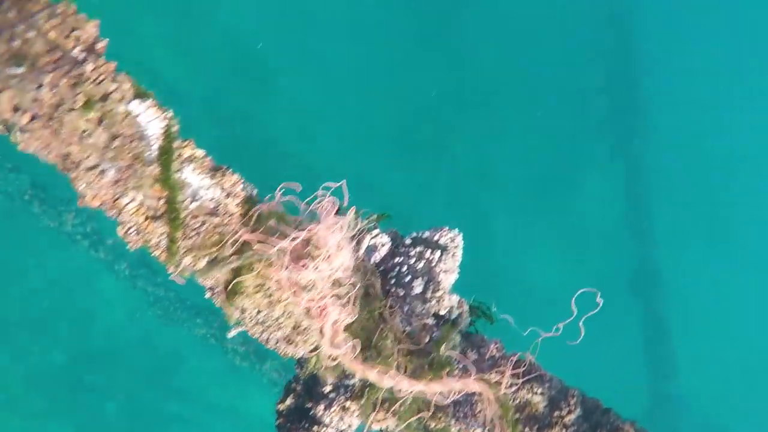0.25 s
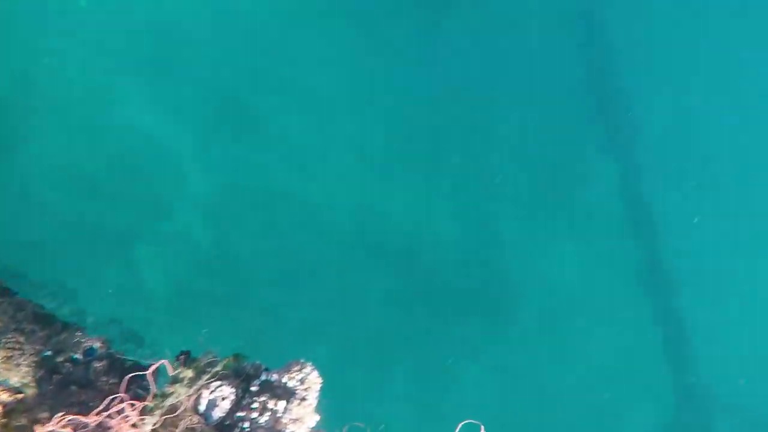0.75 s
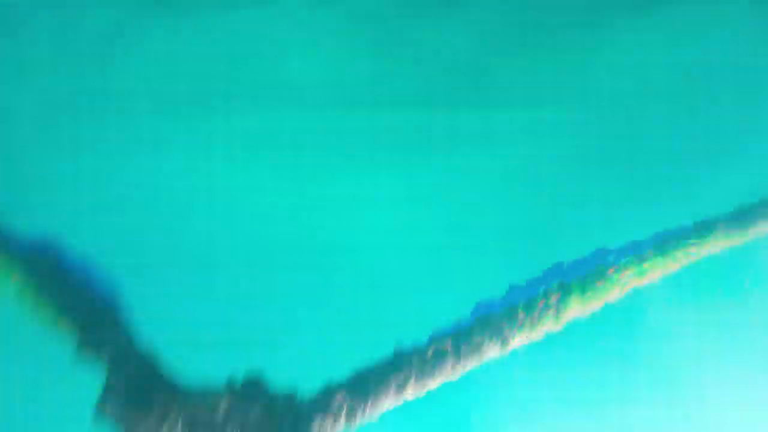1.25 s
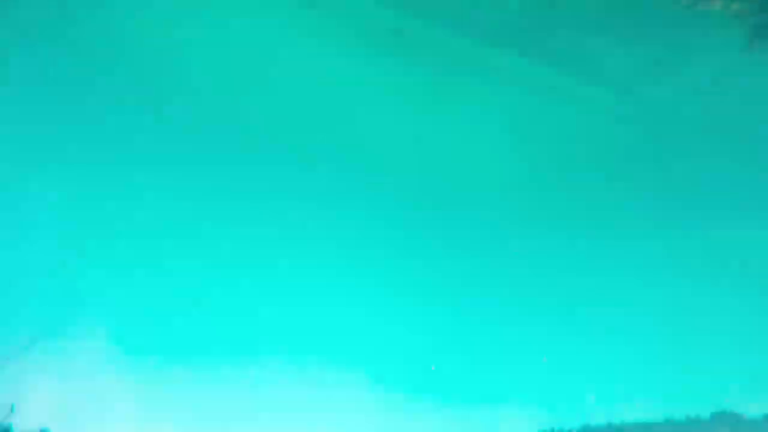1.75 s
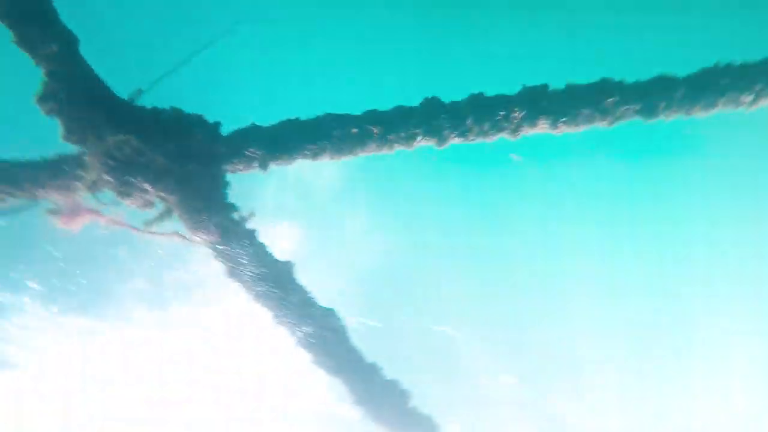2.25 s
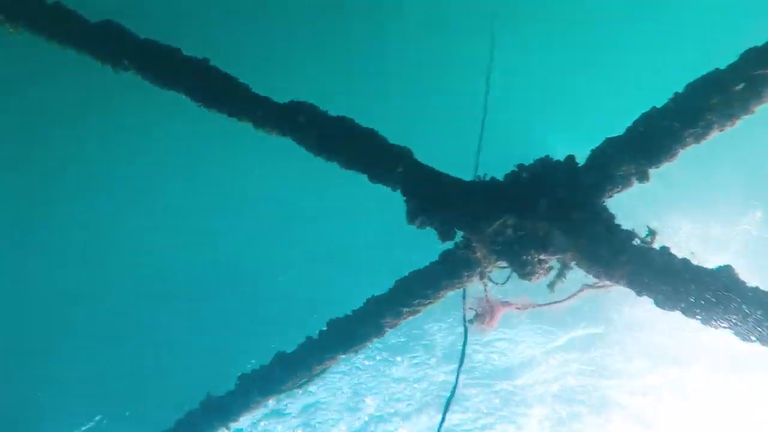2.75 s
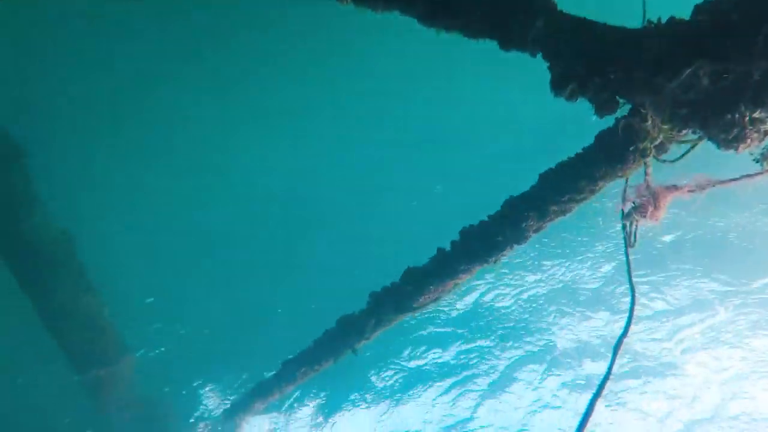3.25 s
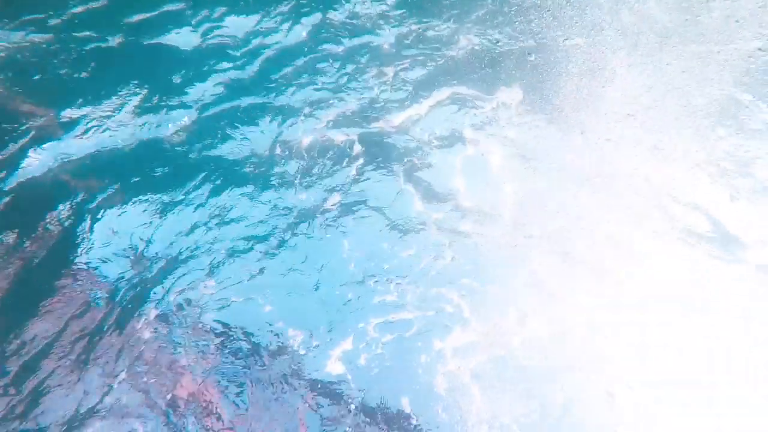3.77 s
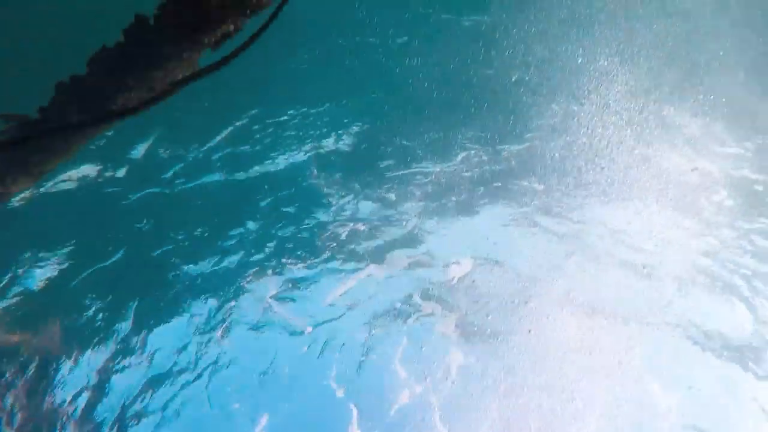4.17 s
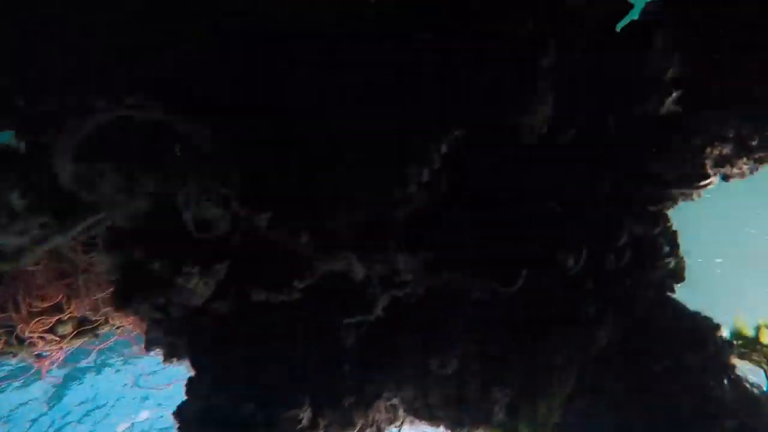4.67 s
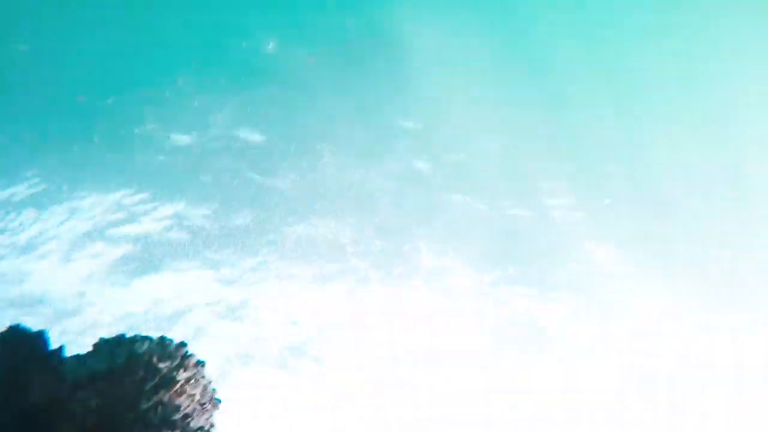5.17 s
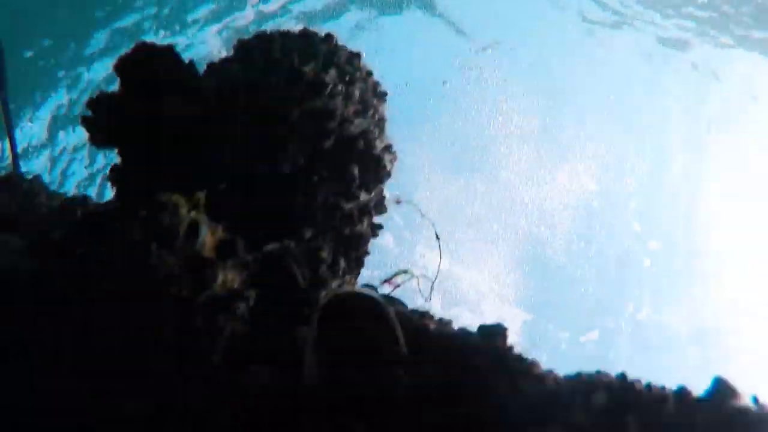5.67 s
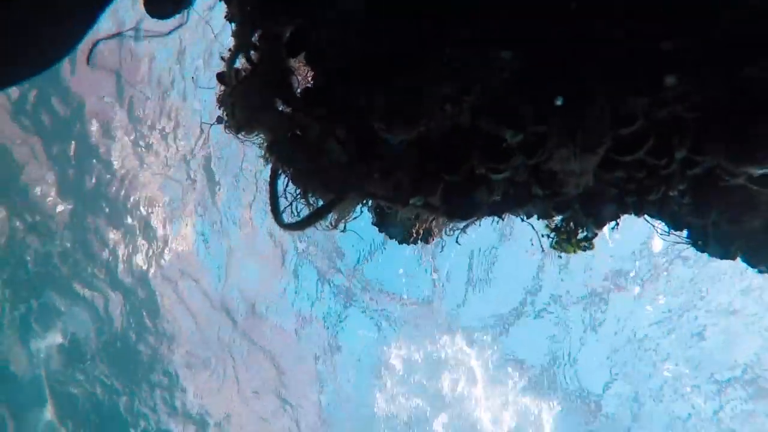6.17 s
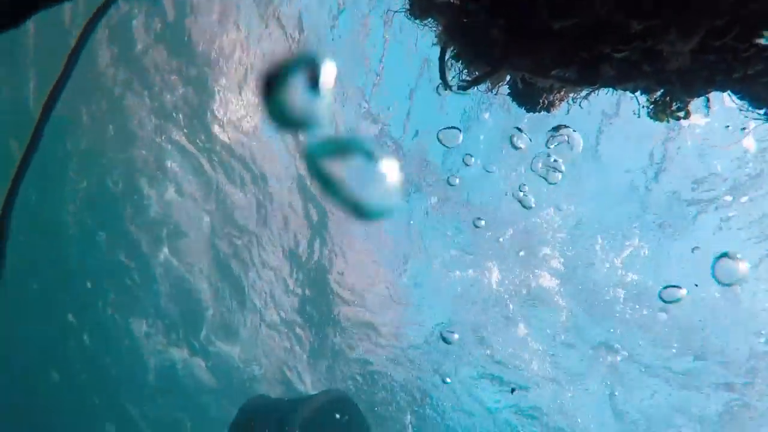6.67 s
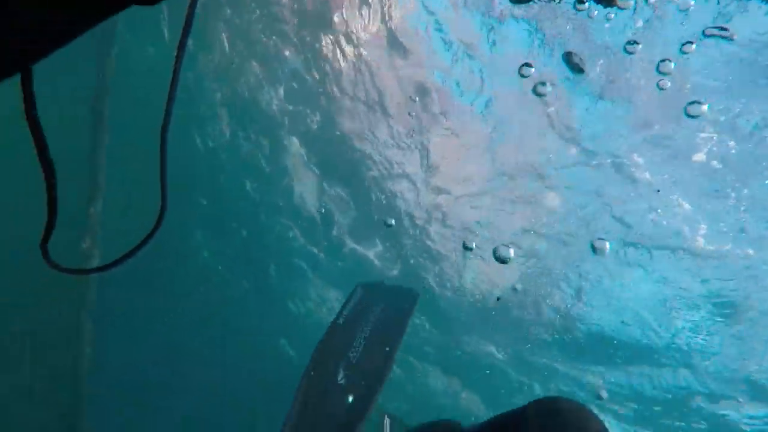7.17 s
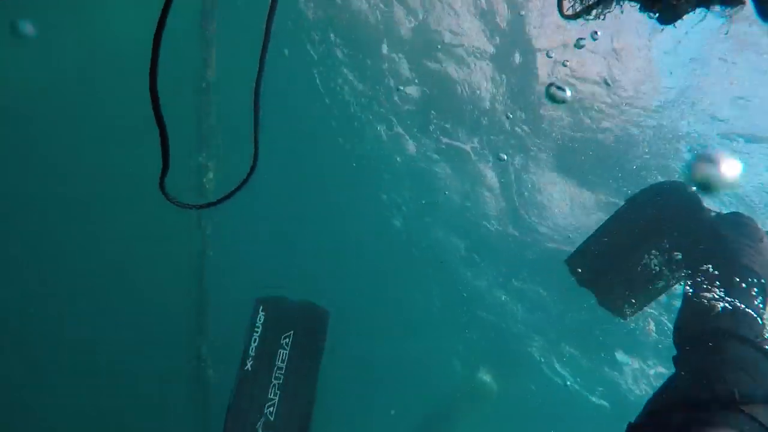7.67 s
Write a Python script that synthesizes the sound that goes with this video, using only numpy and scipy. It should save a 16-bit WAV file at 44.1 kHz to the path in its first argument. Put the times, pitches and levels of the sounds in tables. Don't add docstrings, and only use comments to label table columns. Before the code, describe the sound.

Muffled underwater rumble and drumming against a sealed housing, with heavy dull knocks, scrapes, hissing surf fizz, ticking pops and late ringing bubbles.

```python
import sys
import numpy as np
from scipy import signal
from scipy.fft import rfft, irfft, next_fast_len
from scipy.io import wavfile
from scipy.ndimage import uniform_filter1d, map_coordinates

SR = 44100
rng = np.random.default_rng(int(sys.argv[2]) if len(sys.argv) > 2 else 0)


def volts_from_db(level):
    exponent = np.asarray(level, float) / 20
    return 10 ** exponent


def transcribe(u):
    v = np.clip(np.atleast_2d(u).T, -1, 1)
    q = np.round(v * 32767).astype(np.int16)
    wavfile.write(sys.argv[1], SR, q)


N = 349272

# freq_hz, lead_rad
PORT_LEAD = [(250, 0.6), (500, 1.28), (800, 2.6), (1100, 3.6), (1500, 0.93), (1800, 1.53)]


def unit(x):
    return x / np.sqrt(np.mean(x ** 2) + 1e-20)


def along(points, hz):
    f, db = np.transpose(points)
    return volts_from_db(np.interp(np.log(hz + 1), np.log(f + 1), db))


def wobble(rate):
    knots = rng.standard_normal(int(N * rate / SR) + 4)
    return map_coordinates(knots, [np.arange(N) * rate / SR])


def filtered(x, response):
    m = next_fast_len(N + SR // 2)
    f = np.fft.rfftfreq(m, 1 / SR)
    grid = np.linspace(0, SR / 2, 12000)
    gain = [np.interp(f, grid, g) for g in np.atleast_2d(response(grid))]
    return irfft(rfft(x, m) * np.squeeze(gain), m)[..., :N]


def mode(f, hz, width_hz):
    return 1j * f * width_hz / (hz * hz - f * f + 1j * f * width_hz)


def ports(own_db):
    return rng.standard_normal(N) + volts_from_db(own_db) * rng.standard_normal((2, N))


def rings(events, lasts, usual_db, damping, fall, attack):
    out = np.zeros((2, N + SR))
    for s, db, hz, *pan_db in events:
        t60 = lasts * volts_from_db(-damping * (db - usual_db)) / hz
        t = np.arange(round(t60 * SR)) / SR
        cycles = hz * (t + fall * t60 / 8 * (1 - np.exp(-8 * t / t60)))
        lead = 0.76 * np.interp(hz, *np.transpose(PORT_LEAD))
        envelope = volts_from_db(-60 * t / t60) * (1 - np.exp(-t * hz / attack))
        tone = envelope * np.sin(2 * np.pi * cycles + [[0], [lead]])
        pan = np.array([[.5], [-.5]]) * sum(pan_db)
        gain = volts_from_db(db + 1.5 + pan) / max(np.cos(lead / 2), .5)
        out[:, round(s * SR):][:, :len(t)] += gain * tone
    return out[:, :N]


def grains(count, centre_hz, spread, cycles, size_db, size=300):
    draw, t = rng.random((count, 3)), np.arange(size) / SR
    hz = centre_hz * np.exp(spread * (2 * draw[:, 1:2] - 1))
    strength = volts_from_db(-size_db * np.log(draw[:, 2:] + 0.01))
    envelope = (hz * t / cycles) * np.exp(-3 * hz * t / cycles)
    wave = strength * np.sin(2 * np.pi * hz * t) * envelope
    at = (draw[:, :1] * N).astype(int) + np.arange(size)
    return unit(np.bincount(at.ravel(), wave.ravel(), N + size)[:N])


def bursts(events, t60, gain_of_last, push=0, rise=1e-5):
    out, t = np.zeros((2, N + SR)), np.arange(SR // 16) / SR
    noise = rng.standard_normal((len(events), 2, len(t)))
    for (s, db, last), pair in zip(events, noise):
        envelope = volts_from_db(db - 60 * t / t60) * (1 - np.exp(-t / rise))
        out[:, round(s * SR):][:, :len(t)] += envelope * gain_of_last(last) * (push + pair)
    return out[:, :N]


def housing(f):
    # mode_hz, width_hz, left_db, right_db, left_rad, right_rad
    cover_modes = [(940.0, 180.0, -2.1, 2.3, -0.6, 2.8), (1390.0, 360.0, -4.6, -0.8, 1.8, -2.3),
                   (1700.0, 200.0, -9.9, 3.9, -1.1, -0.9), (2050.0, 240.0, -3.0, -0.6, 2.8, 1.6),
                   (2570.0, 670.0, -3.2, -1.8, -1.3, -0.9), (2890.0, 300.0, -6.9, -4.6, 0.8, 2.0),
                   (3270.0, 250.0, 1.3, -9.4, 1.3, 1.0), (3680.0, 600.0, -6.6, -18.7, 3.1, -1.2),
                   (4640.0, 590.0, -13.1, -9.6, 2.3, 0.3), (5290.0, 220.0, -9.4, -40.6, -2.5, -0.3),
                   (5790.0, 750.0, -17.2, -4.8, -2.4, 1.1), (6050.0, 590.0, -13.2, -6.5, -0.6, -2.6),
                   (7490.0, 1500.0, -31.6, -33.7, 0.4, -1.8), (7810.0, 250.0, -26.2, -32.0, -1.4, -2.3),
                   (8530.0, 200.0, -37.7, -24.4, 2.5, 1.1)]
    # freq_hz, level_db
    surf_tilt = [(300, -38.5), (700, 6), (900, -3), (4000, 7), (9000, 1.5), (11000, -4.5), (13000, -8.5),
                 (14700, -17.5), (15500, -120)]
    left = sum(volts_from_db(l) * np.exp(1j * a) * mode(f, hz, w) for hz, w, l, r, a, b in cover_modes)
    right = sum(volts_from_db(r) * np.exp(1j * b) * mode(f, hz, w) for hz, w, l, r, a, b in cover_modes)
    return along(surf_tilt, f) * [left, right]


def fizz(db, treble_db, grain_db, far, sag):
    # start_s, end_s, over_fizz_db
    crackles = [
        (0.804, 0.77, 2),
        (1.063, 1.17, 4.5),
        (1.252, 1.307, 15.5),
        (4.215, 3.9, 13),
    ]
    # mode_hz, width_hz, level_db
    far_modes = [(1260, 140, 6.5), (1760, 66, 9.5), (1955, 130, 8.5), (2647, 124, 4), (3330, 120, -33.5),
                 (5000, 1060, 3), (4930, 580, 3), (7900, 11000, -11)]
    t = np.arange(N) / SR
    bubbles = grains(count=12000, centre_hz=2863, spread=1.078, cycles=6.7, size_db=2.0)
    wash = ports(-7)
    unlike = filtered(rng.standard_normal((2, N)), lambda f: f ** 8 / (f ** 8 + 6400 ** 8))
    wash = wash + volts_from_db(5) * unlike
    water = wash * volts_from_db(1.3 * wobble(30)) + volts_from_db(grain_db - 9.5) * bubbles
    dragging = sum(volts_from_db(over_db) * (t > a) * (t < b) for a, b, over_db in crackles)
    grit = dragging * volts_from_db(3.06 * wobble(150)) * uniform_filter1d(rng.standard_normal(N), size=5)
    force = water + 1.11 * grit
    high = filtered(force, housing)
    low = filtered(force, lambda f: housing(f * (1 + 0.049 * f ** 4 / (f ** 4 + 4300 ** 4))))
    near = (high + np.clip(sag, 0, 1) * (low - high)) / np.sqrt(np.mean(high ** 2))
    sharp = filtered(near, lambda f: np.sqrt(sum(abs(volts_from_db(g) * mode(f, hz, w)) ** 2 for hz, w, g in far_modes)))
    sound = near + np.clip(far, 0, 1) * (sharp - near)
    treble = filtered(sound, lambda f: f ** 4 / (f ** 4 + 6000 ** 4))
    return volts_from_db(db + 1.0) * (sound + (volts_from_db(treble_db) - 1) * treble)


def turbulence(db):
    # freq_hz, density_db
    swirl = [(8, -48.5), (18, 2), (30, -3), (45, -9), (70, -15.5), (120, -26), (250, -70.5), (500, -80.5),
             (1000, -120)]
    eddies = unit(filtered(ports(-13.5), lambda f: along(swirl, f)))
    return volts_from_db(db) * volts_from_db([[.5], [-.5]]) * eddies


def drumming(db):
    # mode_hz, width_hz, level_db
    shell_modes = [(76, 23.4, -3.5), (120.6, 31.2, 1.5), (166.8, 42.6, -0.5), (204.5, 56, -6.5)]
    push = volts_from_db(4.7 * wobble(9) + 0.35 * wobble(25)) * ports(-7.5)

    def shell(f):
        total = sum((-1) ** k * volts_from_db(g) * mode(f, hz, w) for k, (hz, w, g) in enumerate(shell_modes))
        return total * mode(f, 141, 220)

    return volts_from_db(db + 2.5) * unit(filtered(push, shell))


def rubbing(db):
    # start_s, peak_db, left_minus_right_db
    slip_events = [(1.1, -23, 4.5), (1.435, -19, -4.5), (1.171, -35, 0), (1.531, -36, -3.5),
                   (1.563, -22.5, -3), (1.586, -25, 4.5), (1.62, -25.5, -14), (2.207, -27.5, -6.5),
                   (2.284, -24, -1.5), (2.386, -20, 8.5), (2.427, -37.5, -3), (2.473, -23, 2),
                   (2.51, -29.5, 6.5), (2.54, -33, -6), (2.68, -34.5, -2.5), (3.211, -25, 1),
                   (3.275, -24, 4), (3.303, -26.5, -5), (3.346, -25.5, -1.5), (4.619, -24.5, -2),
                   (4.648, -28.5, 9.5), (5.133, -36, -7), (5.298, -21, 4.5), (5.446, -22, 7),
                   (5.527, -22, 2.5), (5.548, -19, -2), (5.597, -16.5, -6), (5.654, -22, -1.5),
                   (5.568, -25, -4.5), (5.607, -21, -7.5), (5.619, -20, -11), (5.632, -18.5, -6),
                   (5.666, -23, -1), (5.69, -15, -7.5), (5.678, -20, -2.5), (5.697, -11.5, -10.5),
                   (5.808, -22, -8), (6.071, -23, 6), (6.113, -25, -3.5), (6.142, -23, -12),
                   (6.223, -16, -1), (7.328, -31.5, 1)]
    # freq_hz, density_db
    rub_tilt = [(100, -9.5), (250, 2.5), (400, -4), (600, -3.5), (800, -2.5), (1000, -13.5), (1400, -12.5),
                (2500, -28.5), (5000, -120)]
    # freq_hz, density_db
    kick_tilt = [(30, -20.5), (100, 6.5), (400, 7), (850, 7.5), (1300, -5), (2500, -43.5), (6000, -120)]
    jerks = volts_from_db(2.0 * wobble(45) + 2.44 * wobble(160))

    def shift(f):
        return np.exp(1j * np.outer([0, 1], np.interp(f, *np.transpose(PORT_LEAD))))

    scrape = unit(filtered(jerks * ports(4.5), lambda f: along(rub_tilt, f) * shift(f)))
    slips = bursts(slip_events, 0.021, lambda pan_db: volts_from_db([[pan_db / 2], [-pan_db / 2]]),
                   push=1.0, rise=0.00073)
    return volts_from_db(db + 5.0) * scrape + volts_from_db(8.5) * filtered(slips, lambda f: along(kick_tilt, f) * shift(f))


def ducking(t):
    # start_s, depth_db, hold_s, recovery_s
    ducks = [
        (5.685, -8.5, 0.03, 0.19),
        (6.14, -3.5, 0.033, 0.18),
    ]
    clamp_s = 0.0057
    db = 0
    for s, depth_db, hold, recover in ducks:
        since = np.maximum(t - s, 0)
        clamped = 1 - np.exp(-since / clamp_s)
        db = db + depth_db * clamped * np.exp(-np.maximum(since - hold, 0) / recover)
    return volts_from_db(db)


def layers():
    # time_s, turbulence_db
    swell = [(0.0, -29), (0.44, -26), (0.95, -32.5), (1.21, -13), (1.83, -20), (2.29, -12.5), (3.04, -22),
             (3.13, -13.5), (4.41, -22), (4.48, -15), (5.14, -19.5), (5.36, -14.5), (5.78, -9), (5.93, -20),
             (6.17, -20), (7.88, -23.5), (7.92, -32)]
    # time_s, level_db
    handling = [(0, -55.5), (.45, -58), (1.09, -51), (1.1, -36), (1.9, -43), (2.53, -42.5), (2.87, -51.5),
                (3.42, -42), (3.71, -47.5), (4.55, -49), (4.9, -41), (5.56, -42), (5.595, -33),
                (5.705, -24.5), (5.715, -37.5), (6.05, -53), (6.74, -46), (7, -54.5)]
    # time_s, level_db, treble_db
    surf_heard = [(0, -45, 15), (0.402, -43.5, 13), (.82, -42.5, 9), (1.08, -43.5, 8.5), (1.248, -36, -4),
                  (1.65, -39.5, -3.5), (2.53, -34.5, -1), (3.19, -35.5, 1), (3.75, -39.5, 4),
                  (4.6, -40.5, 5.5), (5.5, -34.5, 0), (5.95, -41, 4.5), (6.2, -40.5, 0), (6.5, -41.5, 6),
                  (7.92, -40, 10)]
    # time_s, share (0-1)
    pressed = [(0, 0.05), (1.2, 0), (1.8, 0.94), (2.6, 0.46), (3.6, 0.01), (4.2, 0), (4.7, 0.9), (5.3, 0),
               (6.2, 0.72), (7, 0), (7.9, 1)]
    # start_s, end_s, extra_drumming_db
    broadside = [
        (-.5, 1.2, 12.5),
        (1.05, 0.83, -10),
        (1.6, 2.36, 9.5),
    ]
    t = np.arange(N) / SR
    stream_db, hand_db = np.interp(t, *np.transpose(swell)), np.interp(t, *np.transpose(handling))
    s, surf_db, treble_db = np.transpose(surf_heard)
    facing_db = sum(db * np.sin(np.pi * np.clip((t - a) / (b - a), 0, 1)) for a, b, db in broadside)
    drum_db = -2 + 0.37 * stream_db + 0.57 * hand_db + facing_db
    spray_db = 6.5 * (t > 0.75) * (t < 0.96)
    grain_db = 3 + 0.05 * (hand_db + 49.5) + spray_db
    far = 0.1 + 0.33 * np.maximum(t - 5.46, 0) + 0.12 * wobble(2.443)
    treble_db = np.interp(t, s, treble_db) + 0.53 * wobble(2.5)
    sag = np.interp(t, *np.transpose(pressed)) + 0.6 * wobble(2.18)
    surf = fizz(np.interp(t, s, surf_db), treble_db, grain_db, far, sag)
    return ducking(t) * (turbulence(stream_db) + drumming(drum_db) + rubbing(hand_db) + surf)


def strumming():
    # time_s, pitch_hz, level_db
    strum = [
        [(1.66, 143.6, -27.5), (1.998, 167.5, -15), (2.3, 141.5, -25)],
        [(1.66, 116.8, -8), (1.852, 122.9, -34.5), (2.3, 129, -18.5)],
        [(1.66, 209.5, -42.5), (1.98, 262.8, -28.5), (2.3, 206.2, -34.5)],
    ]
    t, out = np.arange(N) / SR, 0
    for rows in strum:
        s, hz, db = np.transpose(rows)
        phase = 2 * np.pi * np.cumsum(np.interp(t, s, hz) * (1 + 0.052 * wobble(30))) / SR
        level_db = np.interp(t, s, db, -120, -120) - 0.5 + 3.4 * wobble(22.17)
        out = out + volts_from_db(level_db) * np.sin(phase)
    return uniform_filter1d(out, size=40)


def gurgles():
    # start_s, end_s, level_db
    trickles = [
        (5.242, 5.7, -38.5),
        (6.118, 6.342, -42.5),
    ]
    t = np.arange(N) / SR
    level = sum(volts_from_db(db) * (t > a) * (t < b) for a, b, db in trickles)
    cloud = grains(count=1400, centre_hz=600, spread=0.426, cycles=6.9, size_db=0.0, size=1800)
    return volts_from_db([[-4], [1.5]]) * level * cloud


def bubbles():
    # start_s, peak_db, pitch_hz, left_minus_right_db
    big = [(.948, -34, 530, 4), (5.345, -28.5, 413, 8), (5.596, -16, 397, -6.5), (5.624, -26, 420, -4),
           (.775, -34, 497, 6), (4.102, -31, 554, 0), (4.165, -28, 555, -5), (4.186, -29, 500, 4),
           (2.68, -29.5, 489, -3), (6.113, -27, 482, -1.5), (6.143, -11.5, 478, -8.5),
           (6.185, -27, 397, -3), (6.222, -10, 389, -4), (6.439, -28, 374, -5.5), (6.767, -33, 437, 1)]
    middle = [(.748, -40, 766, .5), (5.3, -24, 713, 3), (5.654, -17, 760, -7), (5.678, -10, 728, -9),
              (6.155, -32, 676, -4), (6.232, -27, 517, -11), (6.465, -39, 810, -5), (6.194, -35, 713, -8),
              (6.24, -29, 699, -18), (6.35, -31.5, 626, -6), (6.441, -25, 584, -7), (6.441, -34, 750, -11),
              (6.92, -37, 760, -11), (6.922, -35, 584, -4)]
    small = [
        (2.836, -28, 1370, 4),
        (2.9392, -29.5, 973, -3),
        (6.1421, -13.5, 1117, 2.5),
        (6.2226, -30.5, 1155, -3),
        (6.2722, -33.5, 1160, -9.5),
        (6.3756, -25, 1163, 11.5),
        (6.6094, -21.5, 980, -2.5),
        (7.201, -30, 1080, 0),
    ]
    linger = [
        (1.5, -30, 1740, -5),
        (6.155, -42, 700, -5),
        (6.25, -39, 550, -8),
        (6.265, -33, 663, -2),
        (6.455, -41, 587, -10),
    ]
    rising = [
        (.66, -30, 950, -1),
        (.797, -37, 610, 6),
        (.8, -38, 876, -1),
        (1.048, -38, 750, 3),
    ]
    return (rings(big, 24.0, -28, 0.056, fall=0.013, attack=0.37)
            + rings(middle, 100, -41.5, 0.39, fall=0.042, attack=1.7)
            + rings(linger, 130, -35, 0, fall=0.02, attack=6.5)
            + rings(rising, 81, -35, 0, fall=-0.29, attack=3.5)
            + rings(small, 62, -25, 0.8, fall=0.0092, attack=0.22))


def pops():
    # start_s, peak_db, pitch_hz, left_minus_right_db
    pings = [(.3396, -35, 2038, -12.5), (.6554, -27, 1650, -10), (.6784, -30, 1760, -10),
             (.861, -27, 1920, -11), (1.0947, -22.5, 2210, -3.5), (1.2734, -10, 2350, 2),
             (1.5244, -13.5, 2580, -5), (3.982, -27, 1650, 12), (4.0013, -27.5, 1620, 13),
             (4.3106, -32.5, 3250, 0), (5.5668, -25, 1870, -2), (6.1483, -7.5, 2250, -2),
             (6.3758, -18, 1537, -29)]
    free = [
        (.838, -26.5, 2570, -3),
        (2.7587, -18.5, 2570, -2),
        (4.2584, -29.5, 3230, 3),
        (5.6647, -24, 3330, 6),
        (6.6106, -13, 1617, 3),
        (7.2675, -28, 1920, -6),
    ]
    ticks = [
        (.8145, -25.5, 4900, 3),
        (1.583, -15.5, 4640, -12),
        (1.6346, -33.5, 4670, 32),
        (2.615, -20.5, 4040, -1),
        (3.984, -20.5, 5550, 5),
        (4.0023, -33, 4930, 30),
        (5.784, -37, 8700, 0),
        (6.1074, -19, 4520, 14),
        (6.2287, -19, 4970, -1),
    ]
    chirps = [
        (.63, -11.5, 1746, -11.5),
        (.809, -20, 1760, -13),
    ]
    plinks = [(1.921, -21, 1790, -10), (1.9634, -21.5, 1860, -10), (2.0163, -18.5, 2040, -11),
              (2.055, -19, 1760, -12), (2.1206, -21.5, 2240, -10), (2.1555, -15.5, 2550, -5.0),
              (2.199, -16, 1986, -8), (2.2258, -23, 1986, -9), (2.3336, -23.5, 1800, -7.0),
              (2.4309, -19, 1990, -8), (2.7136, -27, 1910, -9), (2.8096, -21, 1710, -11),
              (2.9714, -28, 1750, -4.5), (3.1218, -29, 1970, -5), (3.1814, -24, 2720, -2.5),
              (3.3169, -19, 2650, -3.0), (3.3984, -27, 1720, -13), (3.46, -30, 1920, 1),
              (3.5568, -25, 3200, 1), (3.8195, -21, 3250, 5), (4.4408, -26, 2080, -5.5),
              (4.8234, -30, 1940, -12), (4.9521, -26, 2350, -6), (4.9886, -19, 2360, -5),
              (5.017, -17.5, 3060, 6), (5.0739, -22, 2020, -8), (5.1093, -21, 1920, -10),
              (5.2995, -17, 1870, -7), (5.3263, -23, 1770, -2.5), (5.3502, -21, 1830, -1.5),
              (5.4286, -26, 1780, -2.0), (5.45, -15, 1950, -2.0), (5.476, -24, 1750, -2.0),
              (5.6476, -28, 1860, 3)]
    spatter = [(5.253, -27, 686, 0), (5.28, -27, 740, -2), (5.447, -26, 720, 1), (5.496, -34, 734, 9),
               (5.614, -18.5, 737, -8), (5.697, -22, 600, -6), (1.59, -20, 1890, -5), (1.428, -23, 2700, 3),
               (.7, -43, 1870, -8), (.772, -25, 2478, -2), (.773, -28, 1820, -6), (.818, -20, 2290, -4),
               (.833, -25, 1460, 0), (.86, -32, 2140, -5), (.918, -35, 3150, 2), (.927, -31, 2350, -3),
               (1.165, -24, 1790, -6), (1.168, -28, 2380, -3), (1.255, -26, 1870, -2),
               (1.255, -12, 2550, -2), (1.288, -20, 993, -2), (1.486, -21, 2760, 2),
               (1.563, -20.5, 1840, -7), (1.584, -20, 1430, 6), (1.587, -22.5, 746, -13.5),
               (1.633, -24.5, 1270, 1), (1.62, -18.5, 2300, -1), (5.681, -29, 2700, -5),
               (5.681, -25, 1380, 4), (6.107, -26, 764, -8), (6.116, -22, 640, -5),
               (6.143, -23.5, 800, -13), (6.144, -22.5, 1360, -9), (6.224, -25, 970, -1),
               (6.302, -23.5, 1890, -4)]
    return (rings(pings, 43.0, -16.0, 0.4, fall=0.067, attack=0.73)
            + rings(free, 102, -18, 0.042, fall=0.024, attack=1.2)
            + rings(ticks, 48, -31, .05, fall=0.15, attack=2.0)
            + rings(chirps, 58, -11, .1, fall=.14, attack=4.7)
            + volts_from_db(-5.5) * rings(plinks, 50, -23.5, .05, fall=0.037, attack=1.3)
            + rings(spatter, 35, -33.0, 0.056, fall=0.02, attack=1.4))


def snaps():
    # start_s, peak_db, direct_treble_db
    snap_events = [(.6434, -20, -24), (1.02, -28, -20), (1.2248, -22.5, -10), (1.255, -24, -35),
                   (1.2765, -31, -3), (1.291, -29, -34), (1.304, -22, -36), (1.3673, -19.5, -40),
                   (1.4773, -22, -15.5), (1.5249, -19.5, -13.5), (1.5657, -24, -37), (1.5823, -17, -45),
                   (1.6218, -25.5, -32), (1.6335, -22, -40), (2.8087, -20, -35), (3.9833, -24.5, -35),
                   (4.0014, -26, -25), (4.1052, -17.5, -50), (4.1649, -20, -38), (4.1893, -20, -24),
                   (5.301, -20, -35), (5.6784, -22.5, -21), (5.786, -25.5, -27), (6.106, -27, -39),
                   (6.1469, -27, -43.5)]
    # freq_hz, density_db
    snap_tilt = [(2000, -43), (5600, 10.5), (7500, 4), (10500, -5), (13000, -21), (15000, -22),
                 (16000, -120)]
    t60_s = 0.0062
    direct = filtered(bursts(snap_events, t60_s, volts_from_db), lambda f: along(snap_tilt, f))
    ringing = filtered(bursts(snap_events, t60_s, np.ones_like)[0], housing)
    return volts_from_db(13.5) * ringing + volts_from_db(11.5) * direct


def blows():
    # start_s, peak_db, pitch_hz
    thuds = [(.009, -8.5, 156), (.315, -19.5, 173), (.515, -24.5, 134), (.553, -6, 243), (.745, -33, 234),
             (.78, -26.5, 237), (.855, -29, 219), (1.093, -11, 106), (1.115, -11, 169), (1.16, -27, 200),
             (1.228, -11, 173), (1.27, -3.5, 73), (1.29, -30, 204), (1.372, -12, 185), (1.199, 5, 141.4),
             (1.54, -3.5, 111), (1.565, -19, 200), (1.638, 9, 129), (2.498, -3.5, 94), (2.63, -26, 147),
             (3, -18, 165.5), (4.013, 4, 148), (4.029, 5, 114), (4.323, -13, 159), (4.359, -12, 122),
             (4.612, -9, 88.4), (4.813, -7.5, 141), (5.011, -3, 166), (5.017, -17, 248), (5.131, -6, 179),
             (5.134, -14, 280), (5.219, -8.5, 114.4), (5.617, -11, 132), (5.679, 3, 81.4), (5.61, -6, 102),
             (5.81, -19, 115), (6.313, -11, 177), (6.477, -19.5, 121.5)]
    # start_s, peak_db, pitch_hz
    bumps = [
        (1.435, -3, 169),
        (5.596, -5, 426),
        (6.068, -9, 303),
    ]
    return (rings(thuds, 12.45, -6.0, 0.34, fall=0.085, attack=1.44)
            + rings(bumps, 3.5, 0, 0, fall=0.33, attack=0.26))


def scene():
    return layers() + strumming() + gurgles() + bubbles() + pops() + snaps() + blows()


def roll_off(x):
    return signal.sosfilt(signal.butter(12, 15300, fs=SR, output="sos"), x)


def record(dry):
    held = dry / (1 + np.abs(dry) ** 6) ** (1 / 6)
    mix = filtered(held, lambda f: 1 / (1 + (f / 15100) ** 30))
    return roll_off(mix)


dry = scene()
out = record(dry)
transcribe(out)
```